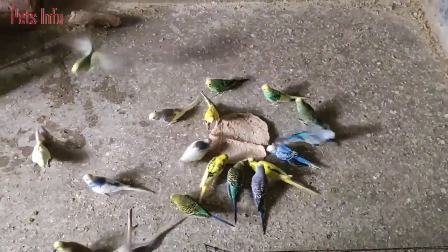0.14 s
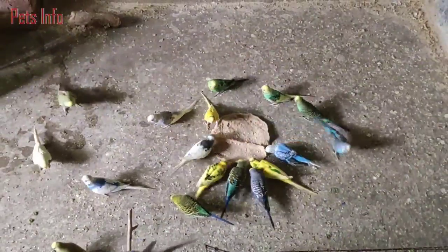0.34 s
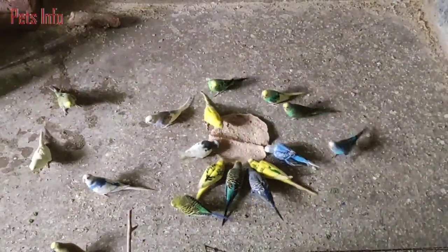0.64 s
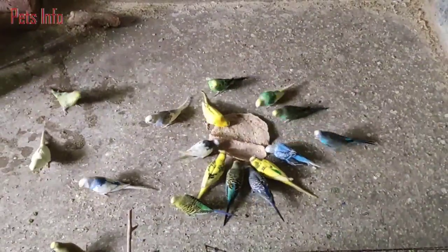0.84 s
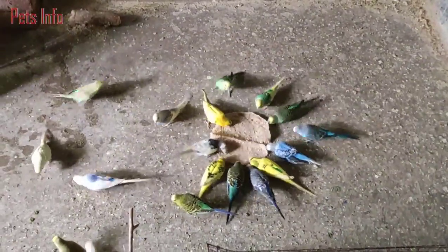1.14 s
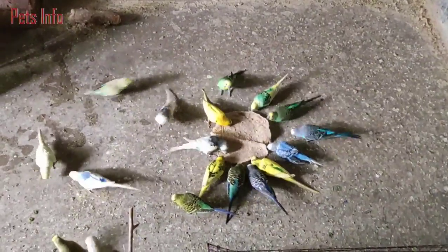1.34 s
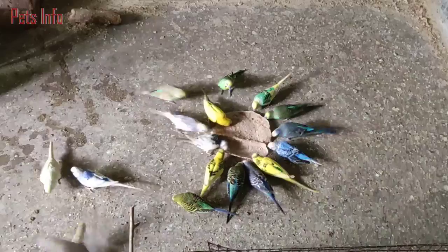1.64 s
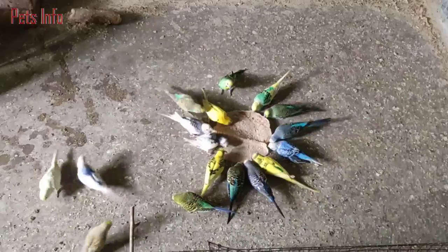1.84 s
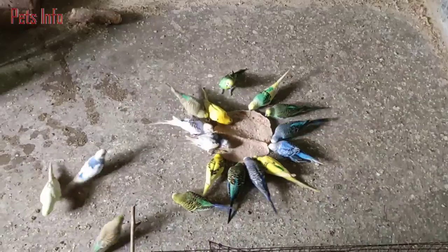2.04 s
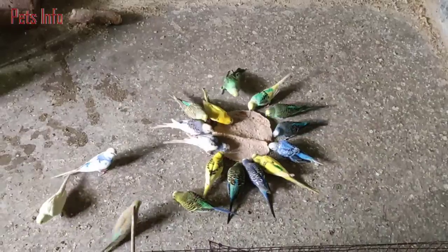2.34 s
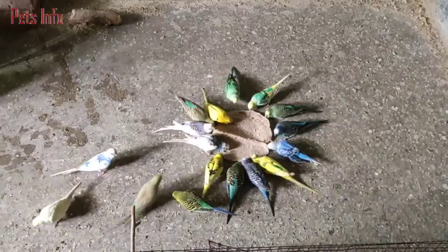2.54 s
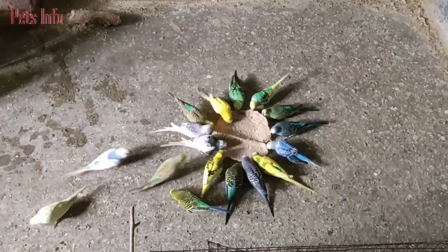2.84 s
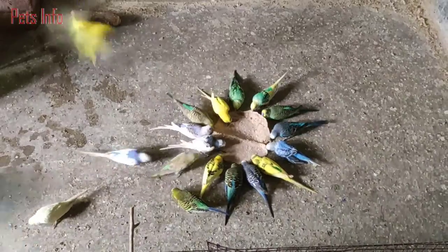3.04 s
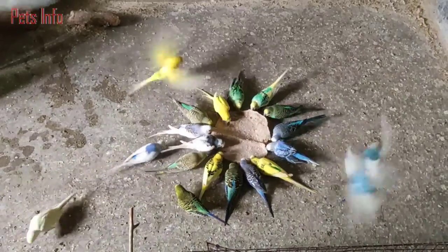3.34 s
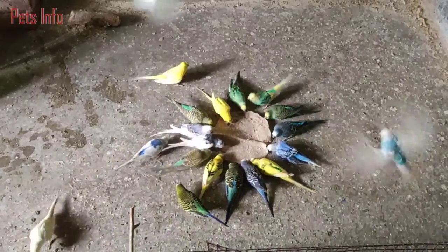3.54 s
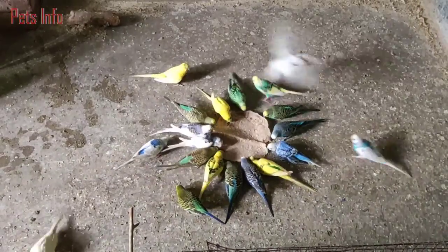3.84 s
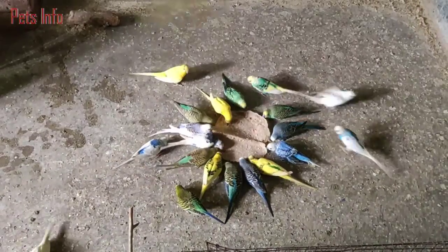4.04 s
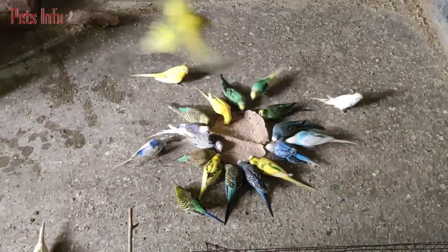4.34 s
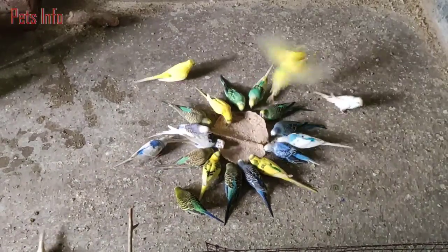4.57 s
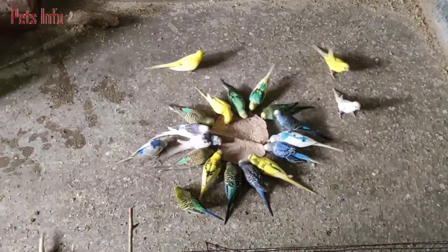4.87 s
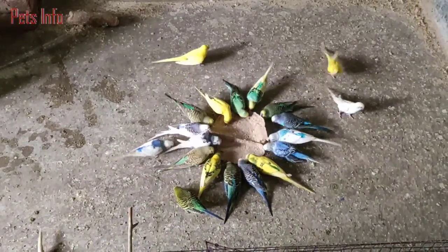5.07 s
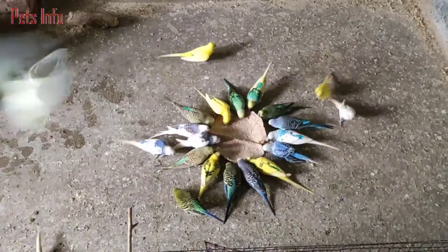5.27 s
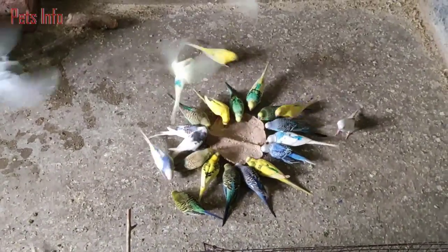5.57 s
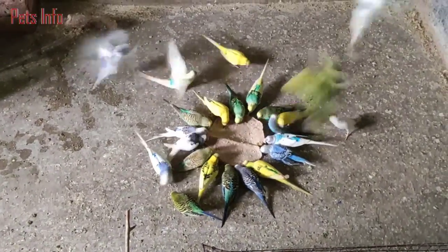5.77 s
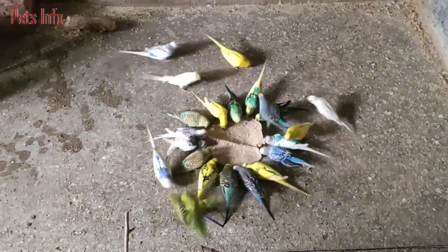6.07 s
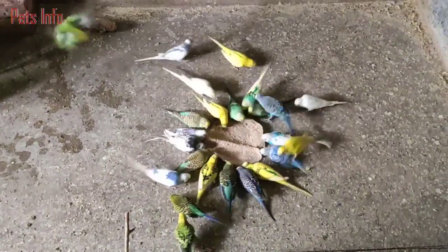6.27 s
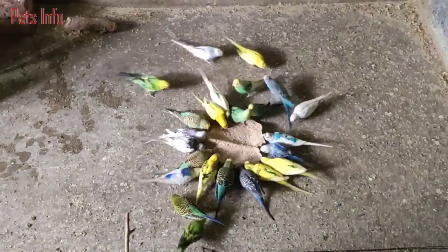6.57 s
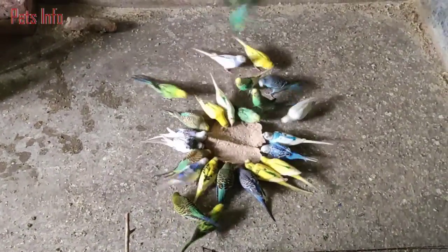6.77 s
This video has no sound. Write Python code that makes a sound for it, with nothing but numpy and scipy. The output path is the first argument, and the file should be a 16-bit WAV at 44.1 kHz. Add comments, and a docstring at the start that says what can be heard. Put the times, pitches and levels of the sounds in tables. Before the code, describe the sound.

In an echoing concrete aviary, many small parrots chatter while feeding. Short gliding whistles and dry, raspy squawks burst close by over dense, fainter chirping. Wings flutter with a low, pulsing rumble, and just after four seconds close strokes thump air against the microphone. Calls continue, thin slightly around six seconds, then finish in a loud flurry of chirps and rustling feathers. Stereo pickup is close to the birds.

```python
"""In an echoing aviary, a flock of small parrots feeds on the concrete floor.
Near birds whistle gliding near-sines and squawk in puffs of noise through a throat resonance.
The rest chatter in random short whistles; beaks and claws tick, and feathers rustle as noise.
Beating wings stir the air and drive low room resonances; close strokes push the air in single swings.
Sparse reflections return the birds' calls, over a steady faint wash of distant echoes."""
import sys
import numpy as np
from scipy import signal
from scipy.fft import rfft, irfft, next_fast_len
from scipy.io import wavfile
from scipy.ndimage import uniform_filter1d

SR = 44100
rng = np.random.default_rng(int(sys.argv[2]) if len(sys.argv) > 2 else 0)


def dump(signal):
    """Clip the signal to [-1, 1] and save it as 16-bit WAV at the path in sys.argv[1]."""
    limited = np.clip(np.atleast_2d(signal).T, -1, 1)
    pcm = np.round(limited * 32767).astype(np.int16)
    wavfile.write(sys.argv[1], SR, pcm)


N = 304731

# Activity of the rest of the flock: t/s, chatter level/dB, feather rustle level/dB
FLOCK = [(0.0, -29, -37.5), (0.44, -48, -33), (0.67, -29, -29.5), (0.98, -35, -34), (1.38, -28, -34),
         (1.61, -40, -34), (1.92, -43, -34), (2.35, -42, -33.5), (3.19, -36, -38), (3.52, -32.5, -35.5),
         (4.43, -36.5, -42), (4.83, -35.5, -35), (5.45, -27.5, -38.5), (5.56, -33.5, -40.5),
         (6.59, -42.5, -49), (6.63, -41, -20.5), (6.79, -24, -19), (6.91, -35, -39)]


def gain_of(db):
    """Amplitude ratio is ten to the power of level/20."""
    return 10 ** (np.asarray(db) / 20)


def evened(x):
    """Normalization to unit rms, the root of the mean power."""
    return x / np.sqrt(np.mean(x ** 2) + 1e-20)


def read(points, hz):
    """Linear interpolation along a logarithmic frequency axis."""
    f, value = np.transpose(points)
    return np.interp(np.log(hz + 1), np.log(f + 1), value)


def levels_over_time(table):
    """Linear interpolation in time of each level column, in dB."""
    s, *levels = np.transpose(table)
    t = np.arange(N) / SR
    return [np.interp(t, s, db) for db in levels]


def coloured(x, spectrum):
    """Linear filtering: the spectrum is multiplied by a frequency-dependent gain."""
    size = next_fast_len(x.shape[-1])
    hz = np.fft.rfftfreq(size, 1 / SR)
    filtered = irfft(rfft(x, size) * gain_of(read(spectrum, hz)), size)
    return filtered[..., :x.shape[-1]]


def resonate(x, hz, width_hz):
    """A damped resonance of peak gain 1, by heterodyning: shift down, smooth, shift back."""
    turn = np.exp(2j * np.pi * hz * np.arange(x.shape[-1]) / SR)
    r = np.exp(-np.pi * width_hz / SR)
    smooth = signal.lfilter([1 - r], [1, -r], x / turn)
    return 2 * (turn * smooth).real


def wander(count, hz):
    """Low-pass random motion of unit rms: white noise through two moving averages of 1/hz seconds."""
    span = int(SR / hz)
    once = uniform_filter1d(rng.standard_normal(count), span)
    return evened(uniform_filter1d(once, span))


def pair():
    """Spatial coherence: two noises alike in the bass, unrelated in the treble, as at spaced microphones."""
    # Likeness of left and right: f/Hz, correlation (1 = identical)
    likeness = [(60, 0.89), (180, 0.88), (550, 0.62), (1650, 0.02), (4970, -0.01), (15000, 0.02)]
    left, other = rfft(rng.standard_normal((2, N)))
    same = np.clip(read(likeness, np.fft.rfftfreq(N, 1 / SR)), -1, 1)
    right = same * left + np.sqrt(1 - same ** 2) * other
    return irfft(np.array([left, right]), N)


def add(places, s, sound, pan_db):
    """Interaural-style cues: a random place, and a weaker, slightly later sound at the far microphone."""
    place, lag = places[rng.integers(len(places))], rng.integers(20)  # lag in samples
    for side, sign in enumerate((1, -1)):
        start = max(round(s * SR), 0) + lag * (sign * pan_db < 0)
        part = place[side, start:][:len(sound)]
        part += gain_of(sign * pan_db / 2) * sound[:len(part)]


def whistle(length, start_hz, end_hz, db, overtone_db, waver_hz):
    """Frequency modulation: a gliding syrinx tone with weak harmonics; a wavering note also throbs."""
    count = max(int(length * SR), 200)
    hz = np.linspace(start_hz, end_hz, count) + waver_hz * wander(count, 327.0)
    turn = 2 * np.pi * np.cumsum(hz) / SR
    overtones = np.sin(2 * turn) + .25 * np.sin(3 * turn)
    tone = np.sin(turn) + gain_of(overtone_db) * overtones
    throb_db = .05 * waver_hz * wander(count, 300.)
    return gain_of(db + throb_db) * tone * signal.windows.tukey(count, .6)


def far_birds():
    """Random superposition: short glides at random moments and pitches, following the flock's level."""
    notes_per_s, centre_hz, spread_octaves = 190., 2950., .58  # spread: greatest shift up or down
    level_db = levels_over_time(FLOCK)[0]
    places = np.zeros((3, 2, N))
    draws = rng.random((2000, 6))
    for moment, size, low, high, glide, span in draws[:int(notes_per_s * N / SR)]:
        hz = centre_hz * 2 ** (spread_octaves * (low + high - 1))
        end_hz = hz * (1 + .45 * (glide - .4))
        note = whistle(.008 + .025 * span, hz, end_hz, 9. * size, -18., 80.)
        add(places, moment * N / SR, note, 3.5)
    return evened(places) * gain_of(level_db)


def feather_rustle():
    """Friction noise: broadband feather sound whose level flickers and follows the flock."""
    # Colour of the rustle: f/Hz, relative level/dB
    feather_colour = [(2500., -20), (4500., 4), (6500., 0.5), (10000., -4), (15500., -15)]
    level_db = levels_over_time(FLOCK)[1]
    return gain_of(level_db + 2.0 * wander(N, 42.0)) * evened(coloured(pair(), feather_colour))


def distant_wash():
    """Diffuse field: steady coloured noise stands for many merged distant echoes."""
    # Colour of the wash: f/Hz, relative level/dB
    wash_colour = [(530, -31.5), (900, -13), (1260, -11.5), (2790, 1), (3680, -7.5), (4950, -26.5),
                   (8080, -18), (14500, -36), (15600, -17.5)]
    return gain_of(-35.5) * evened(coloured(pair(), wash_colour))


def wings():
    """Forced resonance: beat-modulated noise excites room modes, beside a low boom and a flutter."""
    # Wing activity: t/s, boom level/dB, thrum level/dB, flutter level/dB
    activity = [(0.0, -31.5, -34.5, -29.5), (0.8, -25.5, -39, -34.5), (2.3, -34, -33.5, -36.5),
                (2.98, -27.5, -36, -38.5), (3.71, -45, -40.5, -41), (4.0, -28.5, -44, -41),
                (4.18, -37, -33.5, -41), (4.83, -35, -44.5, -42.5), (5.3, -39.5, -44, -46),
                (5.75, -40.5, -44, -36.5), (6.91, -66, -49.5, -48.5)]
    # Resonances of the room: f/Hz, width of each of two passes/Hz, relative level/dB
    modes = [(64.2, 12.3, -1), (121.1, 13.8, -7), (178.5, 3.5, -15.5)]
    # Colour of the flutter: f/Hz, relative level/dB
    flutter_colour = [(12, -49), (20, -11), (43, -9.5), (148, -17.5), (275, -20.5), (396, -18.5),
                      (1100, -32), (2000, -26), (2600, -35), (4400, -120)]
    beats_per_s, boom_hz = 15., 34.3  # mean rates; the boom is the lowest resonance of the room
    boom_gain, thrum_gain, flutter_gain = (gain_of(db) for db in levels_over_time(activity))

    beat_rate = beats_per_s * (1 + 0.143 * wander(N, 2.28))
    beats = 1 + 0.15 * np.sin(2 * np.pi * np.cumsum(beat_rate) / SR)

    boom_turn = 2 * np.pi * np.cumsum(boom_hz * (1 + 0.0445 * wander(N, 7.7))) / SR
    boom = np.sin(boom_turn + np.array([[0], [.6]]))  # right side leads by 0.6 rad
    boom_swell = gain_of(1.8 * wander(N, 6.4))

    push = pair() * beats
    thrum = sum(gain_of(db) * evened(resonate(resonate(push, hz, width), hz, width))
                for hz, width, db in modes)
    flutter = evened(coloured(pair() * beats, flutter_colour))
    return boom_gain * boom_swell * evened(boom) + thrum_gain * evened(thrum) + flutter_gain * flutter


def squawk(length, db, throat_hz, throat_db):
    """Source and filter: uneven snaps of the syrinx puff noise through a throat resonance."""
    # Colour of the rasp: f/Hz, relative level/dB for a cry of -27 dB
    rasp_colour = [(590, -43), (1000, -21), (1300, -27.5), (1680, -8), (2130, -15.5), (3580, 1),
                   (4400, -0.5), (6350, -3), (15600, -18)]
    count = max(int(length * SR), 200)
    turns = np.cumsum(380. * (1 + 0.38 * wander(count, 200.))) / SR  # mean of 380 snaps per second
    puffs = (0.37 + np.exp(-(turns % 1) / 0.31)) * rng.standard_normal(count)

    width_hz = .25 * throat_hz
    throat = resonate(resonate(puffs, throat_hz, width_hz), throat_hz, width_hz)
    tilt_db = 0.14 * (db + 27.0)  # per octave: softer cries are duller
    colour = [(hz, rasp_db + tilt_db * np.log2(hz / 5000.)) for hz, rasp_db in rasp_colour]
    cry = evened(coloured(puffs, colour)) + gain_of(throat_db) * evened(throat)
    return gain_of(db + 1.8 * wander(count, 45.0)) * evened(cry) * signal.windows.tukey(count, .6)


def tick(db, hz):
    """Impact: a beak or claw on a hard surface gives a brief, broadly resonant, decaying noise."""
    t = np.arange(700) / SR
    shape = np.minimum(t / 0.0032, 1) * gain_of(db - 60 * t / 0.038)  # rise 3.2 ms, t60 38 ms
    return shape * evened(resonate(rng.standard_normal(len(t)), hz, 0.5 * hz))


def near_birds():
    """Direct-to-reverberant ratio: each call feeds the walls and also arrives straight."""
    # Whistled notes: t/s, length/s, start f/Hz, end f/Hz, level/dB
    notes = [(0.039, 0.056, 2890, 3170, -27), (0.086, 0.037, 3030, 4030, -19.5),
             (0.107, 0.076, 3460, 3770, -29.5), (0.123, 0.061, 2990, 2970, -26),
             (0.172, 0.05, 3480, 3800, -30), (0.388, 0.07, 2500, 2850, -22),
             (0.456, 0.051, 3450, 3530, -18), (0.522, 0.047, 2700, 3020, -25.5),
             (0.631, 0.029, 2905, 4080, -19), (0.659, 0.06, 3880, 3940, -26),
             (0.672, 0.055, 3060, 3040, -14), (0.754, 0.036, 3000, 3880, -24),
             (0.787, 0.059, 2980, 2990, -26), (1.086, 0.023, 2970, 3140, -21.5),
             (1.127, 0.063, 2850, 4280, -16.5), (1.17, 0.03, 3770, 3630, -29),
             (1.181, 0.061, 3080, 2896, -16.5), (1.377, 0.08, 4270, 3870, -17.5),
             (1.795, 0.04, 2710, 2840, -28.5), (1.842, 0.042, 3340, 3720, -23),
             (1.878, 0.026, 3100, 3080, -20), (2.641, 0.039, 3520, 3580, -23.5),
             (2.773, 0.047, 3580, 3536, -21.5), (3.038, 0.061, 3480, 3520, -23),
             (3.085, 0.054, 4000, 3890, -25), (3.274, 0.04, 2630, 3420, -23),
             (3.299, 0.0097, 3460, 4280, -19.5), (3.305, 0.038, 4150, 3930, -17.5),
             (3.339, 0.04, 3630, 3513, -14.5), (3.382, 0.062, 3553, 3510, -23),
             (3.431, 0.042, 3560, 3486, -19), (3.448, 0.019, 6680, 6710, -22),
             (3.545, 0.063, 2860, 2890, -26), (3.598, 0.34, 1392, 1382, -36.5),
             (3.657, 0.021, 2760, 2730, -26.5), (3.684, 0.014, 2860, 3870, -22.5),
             (3.694, 0.018, 3820, 3906, -13), (3.721, 0.064, 4090, 4120, -17.5),
             (3.743, 0.043, 3570, 3550, -18.5), (3.952, 0.081, 2785, 2970, -28.5),
             (4.132, 0.029, 3750, 3594, -18.5), (4.136, 0.077, 3054, 2960, -25),
             (4.142, 0.028, 3330, 3410, -21.5), (4.16, 0.041, 5900, 5630, -37),
             (4.401, 0.057, 4150, 4120, -23.5), (4.458, 0.025, 3830, 3830, -21),
             (4.542, 0.032, 3780, 3675, -20.5), (4.616, 0.1, 2860, 2800, -23),
             (4.668, 0.04, 2990, 3306, -14.5), (5.096, 0.052, 3070, 3055, -24),
             (5.23, 0.08, 3070, 3150, -20), (5.314, 0.071, 3130, 3540, -25),
             (5.397, 0.096, 4756, 4600, -17.5), (5.858, 0.026, 2660, 2620, -20.5),
             (5.957, 0.04, 2620, 2700, -28), (6.049, 0.045, 3810, 3850, -31),
             (6.474, 0.21, 1374, 1337, -38.5), (6.601, 0.0082, 5490, 5470, -23),
             (6.635, 0.076, 2610, 2695, -25.5), (6.709, 0.037, 6650, 6300, -17),
             (6.746, 0.051, 4060, 4127, -10), (6.779, 0.039, 3250, 3160, -16),
             (6.821, 0.032, 3400, 3530, -30), (6.864, 0.024, 3370, 3436, -17.5)]
    # Harsh squawks: t/s, length/s, level/dB, throat f/Hz
    squawks = [(0.107, 0.023, -18, 3450), (0.486, 0.057, -18.5, 2650), (0.637, 0.035, -33, 6420),
               (0.694, 0.091, -27, 5320), (.77, 0.089, -22.5, 3540), (1.116, 0.043, -35, 5960),
               (1.408, 0.052, -27.5, 5440), (1.519, 0.027, -23, 6140), (1.597, 0.12, -29.5, 5570),
               (1.929, 0.073, -27.5, 6060), (1.997, 0.18, -34.5, 6700), (2.161, 0.077, -19, 6150),
               (2.259, 0.16, -25, 4770), (2.432, 0.021, -25, 5760), (2.534, 0.04, -22.5, 5100),
               (2.686, 0.1, -22, 6800), (2.939, 0.036, -22.5, 6200), (3.026, 0.055, -21, 5130),
               (3.301, 0.16, -21, 3500), (3.439, 0.052, -22, 8640), (3.696, 0.042, -36, 7400),
               (3.718, 0.083, -29, 3700), (3.999, 0.034, -27.5, 7650), (4.178, 0.032, -21, 3550),
               (4.443, 0.16, -33, 6200), (4.569, 0.092, -21.5, 6800), (4.718, 0.021, -11.5, 3190),
               (4.851, 0.076, -18, 7040), (4.921, 0.047, -17, 5700), (5.1, 0.095, -28, 5800),
               (5.405, 0.075, -28, 6960), (5.85, 0.059, -28, 5540), (6.006, 0.046, -31, 5100),
               (6.224, 0.05, -33.5, 2780), (6.619, 0.038, -17.5, 5200), (6.68, 0.054, -15.5, 4830),
               (6.837, 0.056, -17, 3300)]
    # Beaks and claws on hard surfaces: t/s, level before decay/dB, colour f/Hz
    taps = [(0.116, -16, 9300), (0.346, -18, 7050), (5.928, -32, 12000.), (6.197, -38, 11900),
            (6.23, -25, 3370), (6.429, -30, 5000.), (6.486, -20.5, 6500)]
    typical_hz, typical_db = 3300., -20.  # reference note
    throat_ref_hz = 3300.
    cry_direct_db = -2  # direct sound of squawks and ticks, relative to that sent to the walls
    birds = []
    for s, length, start_hz, end_hz, db in notes:
        louder_db = db - typical_db
        # higher notes carry stronger overtones
        overtone_db = min(-25 + 24.5 * np.log2(end_hz / typical_hz), -8.)
        # louder notes hold their pitch better
        waver_hz = np.clip(66.6 - 6. * louder_db, 8., 80.) * min(end_hz / typical_hz, 1)
        note = whistle(length, start_hz, end_hz, db, overtone_db, waver_hz)
        direct_db = -1. + 0.47 * louder_db  # louder notes come from closer birds
        birds.append((s, note, direct_db, rng.normal(3.9, 2.9)))
    for s, length, db, hz in squawks:
        # a low throat rings strongly, a high one hardly colours the rasp
        throat_db = 7 - 18 * np.log2(hz / throat_ref_hz)
        birds.append((s, squawk(length, db, hz, throat_db), cry_direct_db, 1.8))
    for s, db, hz in taps:
        birds.append((s, tick(db, hz), cry_direct_db, 1.8))

    places, direct = np.zeros((3, 2, N)), np.zeros((1, 2, N))
    for s, sound, direct_db, pan_db in birds:
        add(places, s, sound, pan_db)
        add(direct, s, gain_of(direct_db) * sound, pan_db)
    return places, direct[0]


def gusts():
    """Bipolar pressure pulse: a close wing stroke swings the air both ways, with turbulence."""
    # Wing wash buffeting the microphone: t/s, level/dB, Gaussian stroke width/s, signed swing factor
    strokes = [(4.039, -13, 0.01, -1.5), (4.098, -10, 0.0052, -0.78), (4.211, 1.5, 0.0038, 0.46),
               (4.246, 2, 0.0077, 0.29), (4.349, -8, 0.0074, 0.64)]
    t = np.arange(N) / SR
    # turbulence colour: f/Hz, relative level/dB
    swirl_colour = [(8., 7.0), (40., 10.0), (150., 3.0), (400., -25.0), (900., -81.0)]
    swirl = evened(coloured(pair(), swirl_colour))
    total = np.zeros((2, N))
    for s, db, width, way in strokes:
        u = (t - s) / width
        total += gain_of(db) * np.exp(-u ** 2 / 2) * (way * u * .6 + .1 * swirl)
    return total


def room(places):
    """Reverberation: sparse reflections, different for each place, decay at a rate set by frequency."""
    # Reverberation time: f/Hz, t60/s
    echo_times = [(1000., 0.43), (3000., 0.56), (6000., 0.73), (12000., 0.38)]
    taps = np.zeros((len(places), 2, SR))
    jitter = rng.integers(0, 20, (len(places), 2, (SR - 301) // 20))
    at = np.arange(300, SR - 20, 20) + jitter  # one reflection in every 20 samples
    np.put_along_axis(taps, at, rng.choice([-1., 1.], at.shape), 2)
    hz, t, z = signal.stft(taps, SR, nperseg=256)
    decay = gain_of(-60 * t / read(echo_times, hz)[:, None])
    tail = signal.istft(z * decay, SR, nperseg=256)[1]
    tail[..., :300] = 0  # nothing returns before the nearest wall answers
    tail = tail / np.linalg.norm(tail[0, 0])
    return signal.fftconvolve(places, tail, axes=2)[..., :N].sum(0)


def scene():
    """Linear superposition of direct calls, their echoes, wash, rustle and moving air."""
    far = far_birds()
    near, straight = near_birds()
    direct = straight + gain_of(-7) * far.sum(0)  # far birds are mostly echo
    moving_air = (wings() + gusts()) * gain_of([[.9], [-.9]])  # left is 1.8 dB stronger
    return direct + room(near + far) + distant_wash() + feather_rustle() + moving_air


def record(dry):
    """Amplitude limiting at full scale, then band limiting by a linear-phase low-pass filter."""
    edge_hz = 15750
    held = np.clip(dry, -1, 1)
    low_pass = signal.firwin(1535, edge_hz, window=("kaiser", 10), fs=SR)
    return signal.oaconvolve(held, low_pass[None], "same")


dry = scene()
out = record(dry)
dump(out)
```